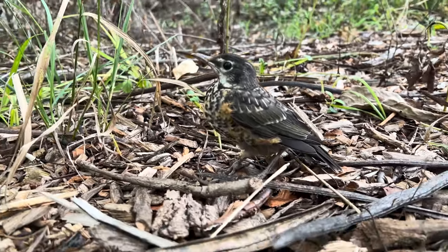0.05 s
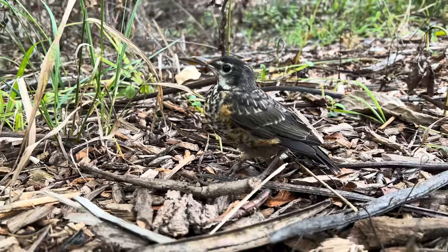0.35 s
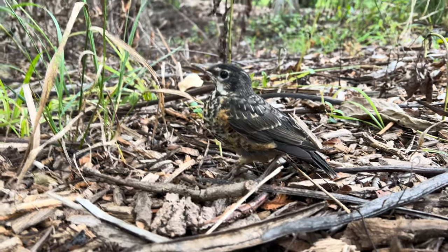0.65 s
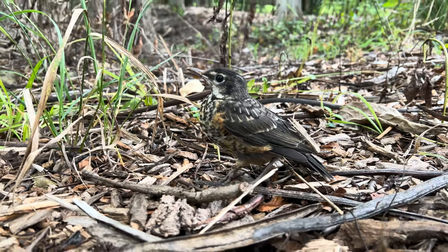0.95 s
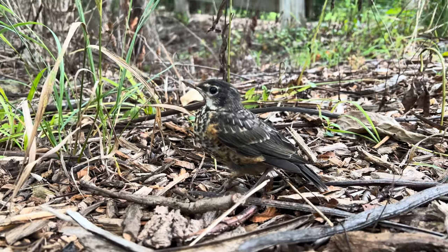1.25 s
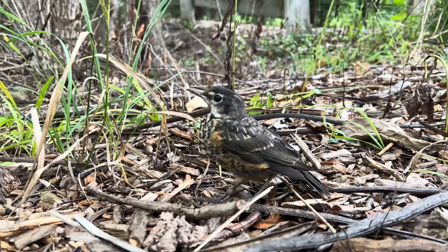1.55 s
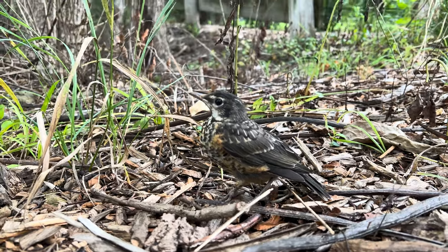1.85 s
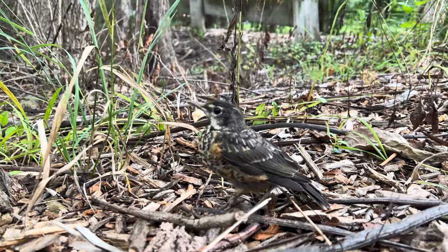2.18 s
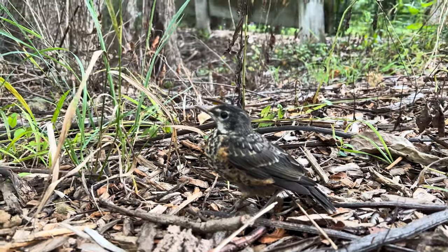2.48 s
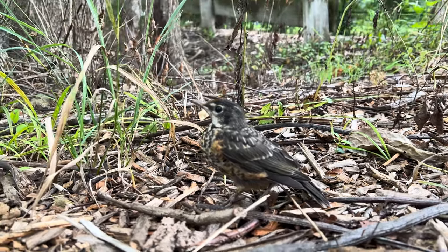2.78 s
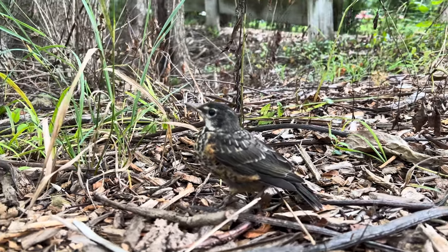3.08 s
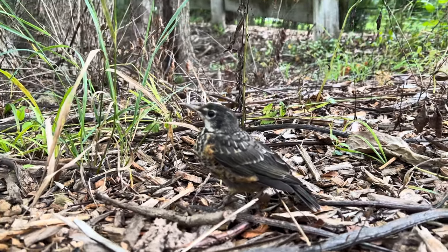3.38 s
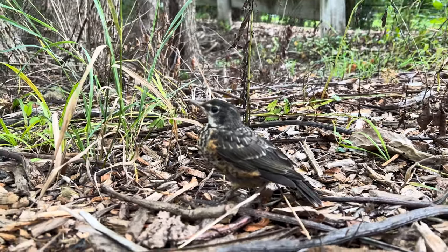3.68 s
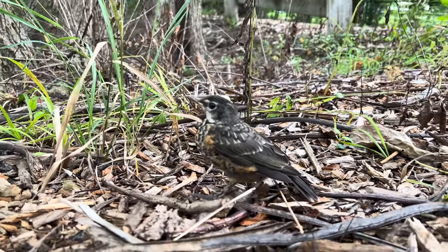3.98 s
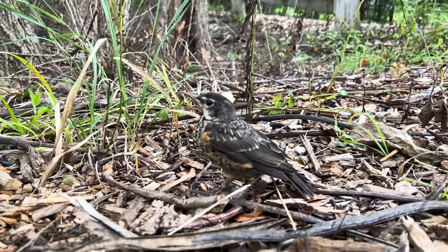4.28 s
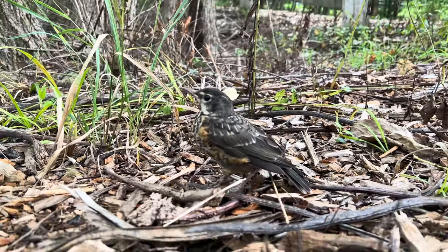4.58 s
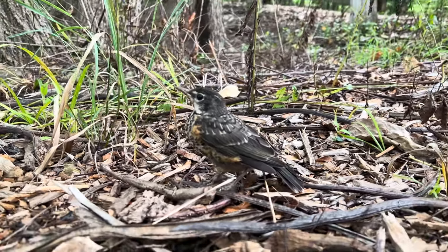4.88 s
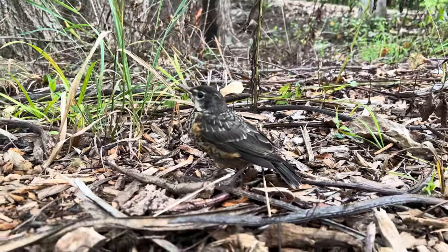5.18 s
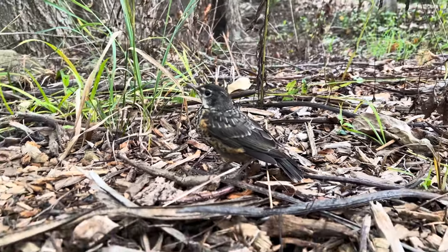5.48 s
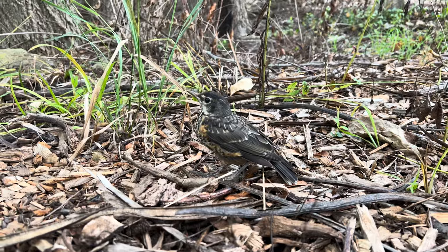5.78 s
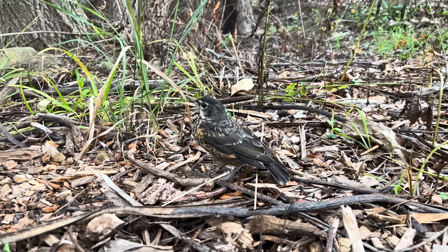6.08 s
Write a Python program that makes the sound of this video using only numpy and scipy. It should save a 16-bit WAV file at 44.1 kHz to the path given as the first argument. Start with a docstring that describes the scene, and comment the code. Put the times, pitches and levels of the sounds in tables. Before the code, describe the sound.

A few soft, high bird whistles in a garden over the continuous low rumble and hum of faraway traffic.

```python
"""Garden birds over distant traffic

Road traffic blurs into a steady rumble and tyre wash, out of which engines drone at their firing rates
and one nearer car swells and fades. Small birds whistle thin, high notes that linger as scatter among
the trees; a nearer one calls three rising seeps. A phone low over the mulch hears it at two close ports."""
import sys
import numpy as np
from scipy import signal
from scipy.fft import rfft, irfft
from scipy.io import wavfile
from scipy.ndimage import uniform_filter1d

SR = 44100
rng = np.random.default_rng(int(sys.argv[2]) if len(sys.argv) > 2 else 0)


def bounce(signal):
    """Save signal as a 16-bit WAV file at the path given by the first command-line argument."""
    frames = np.transpose(np.atleast_2d(signal))
    limited = np.clip(frames, -1, 1)
    pcm = np.round(limited * 32767).astype(np.int16)
    wavfile.write(sys.argv[1], SR, pcm)


N = 275625
T = np.arange(N) / SR
HZ = np.maximum(np.arange(N // 2 + 1) * SR / N, 1)

# the traffic thins, then builds: t/s, then level/dB of rumble, roar and tyre wash (used about their means)
TRAFFIC_FLOW = [(0, -37.5, -49, -48.5), (0.8, -37, -51, -49), (1.8, -39, -52.5, -49),
                (2.4, -38.5, -52, -48.5), (3.3, -38.5, -48.5, -47), (4.4, -38, -51.5, -47),
                (4.75, -37, -51.5, -47.5), (5.5, -37.5, -52.5, -47.5), (6.25, -37, -52, -46.5)]


def undb(db):
    """Amplitude ratio of a level in decibels."""
    return 10 ** (np.asarray(db) / 20)


def unit(x):
    """Normalisation to an rms of 1."""
    return x / np.sqrt(np.mean(x ** 2))


def curves(table):
    """Linear interpolation of each column over time."""
    times, *columns = np.transpose(table)
    return [np.interp(T, times, column) for column in columns]


def across(points):
    """Interpolation of a table over logarithmic frequency."""
    hz, value = np.transpose(points)
    return np.interp(np.log(HZ), np.log(hz), value)


def walk(rate):
    """Sample-and-hold noise, rate steps a second, smoothed twice; its spread is near 1."""
    hold = int(SR / rate)
    held = np.repeat(rng.standard_normal(N // hold + 1), hold)[:N]
    return 1.286 * uniform_filter1d(uniform_filter1d(held, hold), hold)


def split(x, hz):
    """Complementary filtering: the parts of a sound below and above a frequency."""
    low = irfft(rfft(x) / (1 + (HZ / hz) ** 6), N)
    return low, x - low


def diffuse(spectrum, flutter_db, flutter_rate):
    """A diffuse field is coherent at two close ports in the bass; moving air makes each octave waver."""
    # likeness of the ports: f/Hz, coherence (0-1)
    port_coherence = [(100, 1), (250, .99), (500, .87), (870, .22), (1050, .24), (1380, .5), (1600, .94),
                      (2100, .92), (2900, .1), (4800, .15), (6200, .85), (9000, .8), (14000, .5)]
    # lead of the left port: f/Hz, phase/rad
    port_phase = [(60, -0.02), (300, -0.21), (750, -0.96), (1050, 0.67), (1450, 0.039), (2500, -0.15),
                  (3200, 1.3), (4400, -1.26), (5100, -1.15), (15000, -1.52)]
    # left port minus right: f/Hz, level/dB
    port_balance = [(50, -.2), (110, -.7), (200, -1.7), (380, -2.8), (700, -5), (1290, -1.2), (2380, -.5),
                    (6000, .4)]
    shared, own = rfft(rng.standard_normal((2, N)))
    coherence = np.clip(across(port_coherence), 0, .9995)
    right = (coherence * shared + np.sqrt(1 - coherence ** 2) * own) * np.exp(-1j * across(port_phase))
    tilt_db = across(port_balance) / 2
    ports = np.array([shared * undb(tilt_db), right * undb(-tilt_db)]) * undb(across(spectrum))
    out = 0
    for octave in range(4, 15):
        band = np.maximum(1 - np.abs(np.log2(HZ) - octave), 0)
        out = out + irfft(ports * band, N) * undb(flutter_db * walk(flutter_rate))
    return unit(out)


def air_hiss():
    """Faint diffuse noise whose level follows about half of the tyre wash's swell."""
    # spectrum of the hiss: f/Hz, relative level/dB
    spectrum = [(1760, -38), (3000, -3), (4230, -2.5), (5160, -5.5), (7070, -3.5), (9120, -11),
                (12900, -31), (15500, -32)]
    tyre_db = curves(TRAFFIC_FLOW)[2]
    swell_db = 0.48 * (tyre_db - tyre_db.mean())
    return diffuse(spectrum, flutter_db=0.65, flutter_rate=11) * undb(-59.5 + swell_db)


def traffic():
    """Incoherent summation: many vehicles blur into rumble, roar and tyre wash that swell with the flow."""
    # spectrum of the road's rumble and the roar above it: f/Hz, relative level/dB
    rumble_spectrum = [(16, -42), (28, -22), (41, -9), (64, -1), (97, -5), (141, -9), (183, -14),
                       (217, -11.5), (341, -23.5), (379, -22.5), (534, -27), (660, -27.5), (860, -45.5),
                       (1450, -120)]
    # spectrum of the tyre wash: f/Hz, relative level/dB
    tyre_spectrum = [(440, -42), (740, -1.5), (933, 0.5), (1630, -4), (2210, -7), (3220, -16),
                     (5000, -29.5), (6500, -58), (11000, -120)]
    low_db, roar_db, tyre_db = (level - level.mean() for level in curves(TRAFFIC_FLOW))
    low, roar = split(diffuse(rumble_spectrum, flutter_db=0.87, flutter_rate=4.8), hz=340)
    rumble = low * undb(low_db) + roar * undb(roar_db - 0.5)
    body, hiss = split(diffuse(tyre_spectrum, flutter_db=0.84, flutter_rate=6.8), hz=1300)
    wash = body * undb(1.4 * tyre_db) + hiss * undb(tyre_db)  # so thin traffic sounds brighter
    return undb(-34) * rumble + undb(-46.5) * wash


def passing_car():
    """Spherical spreading: the tyre noise of a nearer car varies inversely with its distance."""
    # spectrum of its tyres: f/Hz, relative level/dB
    spectrum = [(200, -60), (750, -37), (1150, 4), (1800, -3), (2300, -6.5), (3200, -24), (6000, -70)]
    closest_s, half_power_s = 5.57, 0.33
    relative_distance = np.hypot(1, (T - closest_s) / half_power_s)
    return diffuse(spectrum, flutter_db=2.5, flutter_rate=6) * undb(-52.5) / relative_distance


def firing(hz, wander):
    """Periodic firing: far off only the fundamental and its octave remain, wandering a little in pitch."""
    phase = 2 * np.pi * np.cumsum(hz * (1 + wander * walk(12))) / SR
    return unit(np.sin(phase) + undb(-20.5) * np.sin(2 * phase))


def engines():
    """Modulated firing tones: one hums on, wavering in the moving air; the others swell, glide and fade."""
    # the humming engine: t/s, firing f/Hz, level/dB
    hum = [(2.9, 126.6, -62), (3.25, 126, -40.5), (3.95, 125.5, -39.5), (4.2, 123.1, -35.5),
           (4.6, 122.9, -36), (4.92, 122.3, -44), (5.1, 123, -66)]
    # droning engines: loudest at t/s, duration/s, firing f/Hz, glide/(Hz/s), level/dB
    drones = [(0.05, 0.45, 53.4, -4, -34), (0.654, 1.1, 112.3, 8, -44.5), (1.6, 8.9, 52.27, 0, -41),
              (2.799, 0.7, 103.2, 4.5, -44), (3.661, 0.62, 157.8, -7, -42.5), (4.261, 0.99, 48, -5, -39.5),
              (4.7, 0.22, 69, -0.5, -39), (4.9, 0.27, 153.8, 38, -41), (5.1, 1.32, 67.07, -2.5, -38),
              (5.521, 1.1, 90.43, 7, -38), (5.949, 0.27, 204.8, -39.5, -42.5)]
    hum_hz, hum_db = curves(hum)
    out = firing(hum_hz, wander=.005) * undb(hum_db + 1.2 * walk(rate=9))
    for loudest, length, hz, glide, db in drones:
        since = T - loudest
        swell_db = -7 * (2 * since / length) ** 2 + 0.5 * walk(rate=7.2)
        out = out + firing(hz + glide * since, wander=0.00913) * undb(db + swell_db)
    return out


def trees(x, t60, wet_db, lag, build_s=0.0017):
    """Reverberation: the direct sound, lag samples later on the left, plus scatter off trunks and fence."""
    t = T[:SR]
    scatter = rng.standard_normal((2, SR)) * undb(-60 * t / t60) * (1 - np.exp(-t / build_s))
    scatter /= np.sqrt(np.sum(scatter ** 2, axis=1, keepdims=True))
    left = irfft(rfft(x) * np.exp(-2j * np.pi * HZ * lag / SR), N)
    return np.array([left, x]) + undb(wet_db) * signal.fftconvolve(x[None], scatter, axes=1)[:, :N]


def whistles(notes, glide_s, quaver, flick=0):
    """Frequency modulation: notes glide, quaver and may flick down; noise modulation frays them to a rasp."""
    out = np.zeros(N)
    unsteady = 1 + quaver * walk(260)
    fray = (walk(1200) + 1j * walk(1200)) / np.sqrt(2)
    for start, length, from_hz, to_hz, db, rasp in notes:
        span = (T > start) & (T < start + length)
        progress = (T[span] - start) / length
        glide_hz = to_hz + (from_hz - to_hz) * np.exp(-progress * length / glide_s)
        hz = glide_hz * (1 - flick * progress ** 20) * unsteady[span]
        carrier = np.exp(2j * np.pi * np.cumsum(hz) / SR)
        tone = (np.sqrt(1 - rasp) + np.sqrt(rasp) * fray[span]) * carrier
        envelope = np.sin(np.pi * progress) ** 0.29
        out[span] += undb(db) * np.sqrt(2) * envelope * tone.imag
    return out


def phrase(start, length, hz, db, rasp, intro_hz, tag_hz, tag_db):
    """A three-note pitch contour: a soft husky intro, the rising whistle and a short, low, falling tag."""
    intro_rasp, tag_rasp = .6, .27
    return [(start - .066, 0.04, intro_hz, intro_hz, db - 5.5, intro_rasp),
            (start, length, hz * (1 - 0.0316), hz, db, rasp),
            (start + length + .019, 0.024, tag_hz * 1.025, tag_hz, tag_db, tag_rasp)]


def far_birds():
    """Far from the source scatter outweighs direct sound: phrases and chirps linger among the trees."""
    # one bird's song: t/s, duration/s, final f/Hz, relative level/dB and rasp (0-1) of the main whistle,
    # intro f/Hz, tag f/Hz, tag relative level/dB
    phrases = [(1.024, 0.079, 6350, -55, .16, 6440, 5180, -60.5),
               (1.682, 0.088, 6440, -54.3, 0.15, 6820, 5060, -58.5),
               (2.325, .115, 6570, -57.3, .24, 6630, 4970, -58.5)]
    # single peeps and slurs: t/s, duration/s, start f/Hz, final f/Hz, relative level/dB, rasp (0-1)
    peeps = [(0.0017, 0.032, 7280, 7240, -56.5, 0.3), (0.237, 0.032, 5650, 5250, -59, 0.9),
             (0.304, 0.078, 4900, 4600, -62.3, .13), (0.289, 0.04, 3700, 3670, -67, .25),
             (3.507, 0.056, 7180, 7130, -60, 0.08)]
    song = whistles([note for row in phrases for note in phrase(*row)], glide_s=.022, quaver=0.009)
    chirps = whistles(peeps, glide_s=.017, quaver=0.009)
    return trees(song + chirps, t60=.53, wet_db=4.5, lag=0.68) * undb(-0.5)


def near_bird():
    """Nearer the source direct sound outweighs scatter: three thin seeps swoop up, then flick down."""
    # its calls: t/s, duration/s, top f/Hz, direct level/dB
    seeps = [(3.986, 0.091, 9260, -58.5), (4.138, .068, 9200, -51.5), (4.307, 0.048, 9060, -49)]
    rise, rasp = 0.088, .04  # shares of the top pitch and of the power
    notes = [(start, length, hz * (1 - rise), hz, db, rasp) for start, length, hz, db in seeps]
    calls = whistles(notes, glide_s=.013, quaver=0.003, flick=0.08)
    return trees(calls, t60=.32, wet_db=-2, lag=0.99)


def scene():
    """Superposition: hiss, traffic and engines behind, birds in the trees."""
    return air_hiss() + traffic() + passing_car() + engines() + far_birds() + near_bird()


def record(dry):
    """Band limiting: the phone sheds the deepest rumble and cuts the top."""
    bottom_hz, top_hz = 35, 15650
    thinned = signal.sosfilt(signal.butter(5, bottom_hz, "highpass", fs=SR, output="sos"), dry)
    return signal.sosfilt(signal.ellip(8, .2, 70, top_hz, fs=SR, output="sos"), thinned)


dry = scene()
out = record(dry)
bounce(out)
```